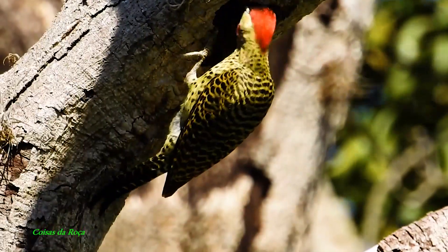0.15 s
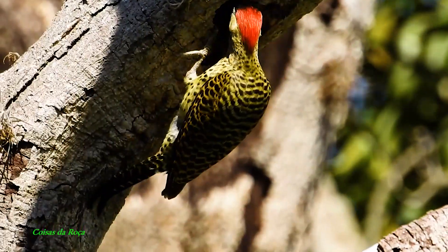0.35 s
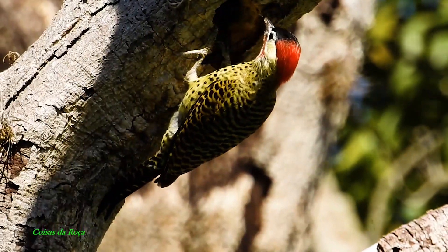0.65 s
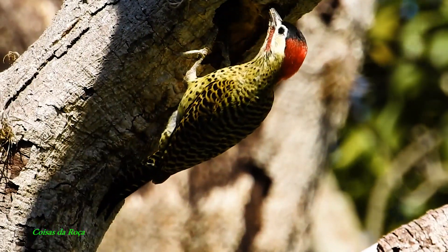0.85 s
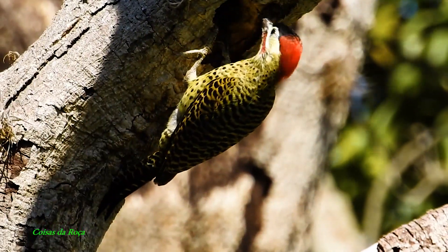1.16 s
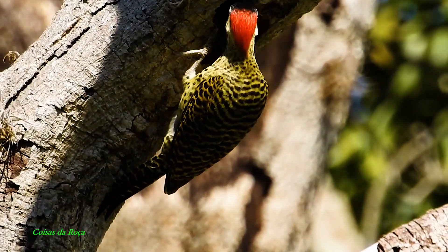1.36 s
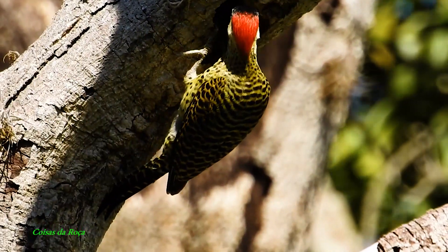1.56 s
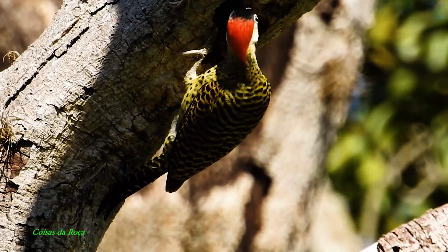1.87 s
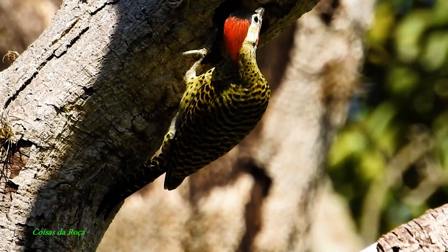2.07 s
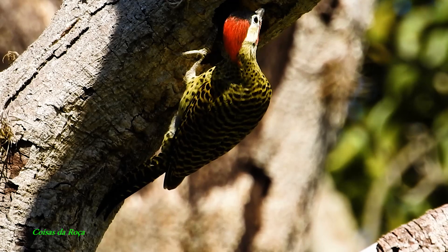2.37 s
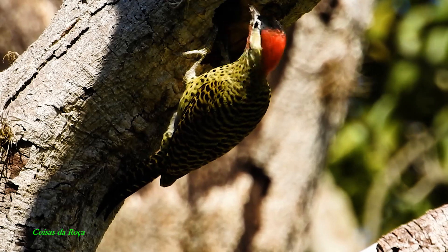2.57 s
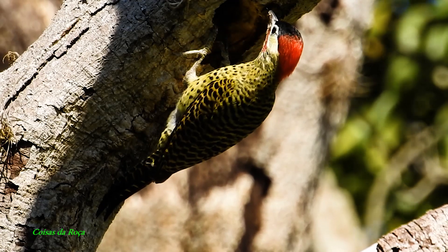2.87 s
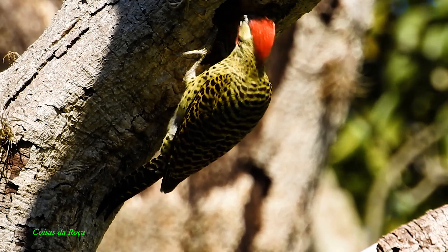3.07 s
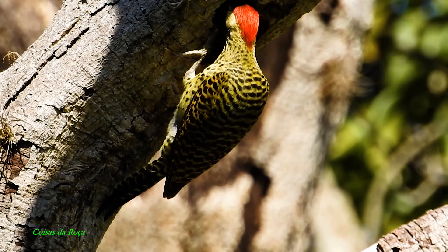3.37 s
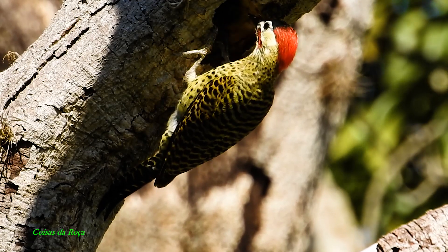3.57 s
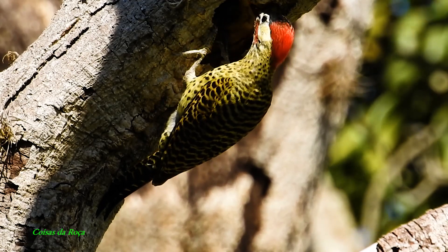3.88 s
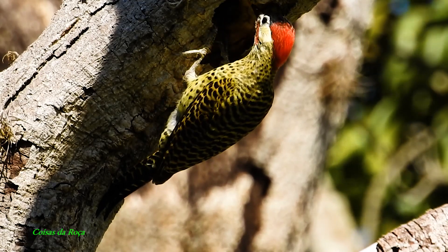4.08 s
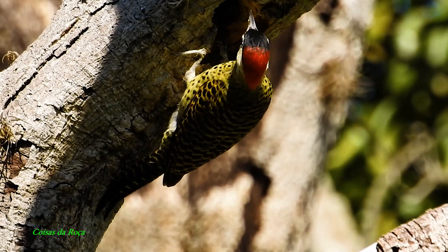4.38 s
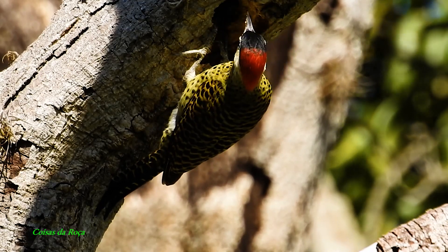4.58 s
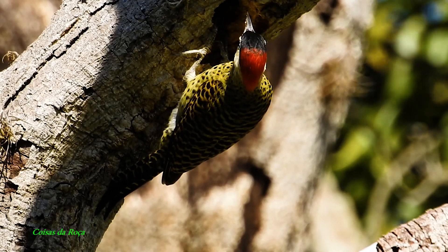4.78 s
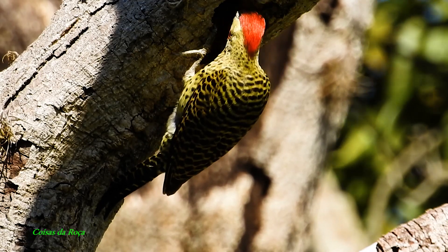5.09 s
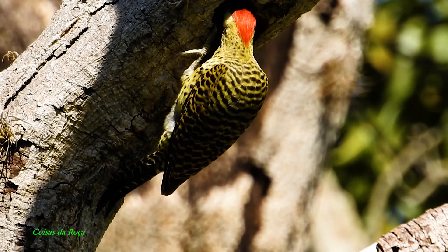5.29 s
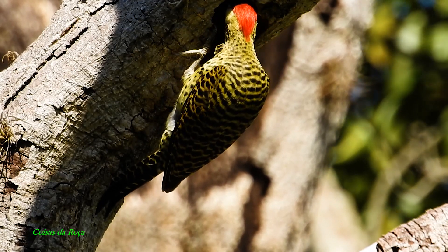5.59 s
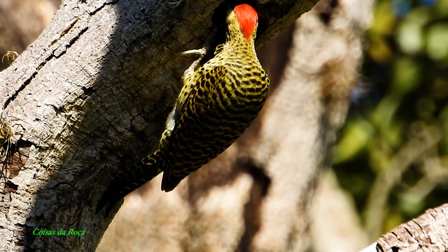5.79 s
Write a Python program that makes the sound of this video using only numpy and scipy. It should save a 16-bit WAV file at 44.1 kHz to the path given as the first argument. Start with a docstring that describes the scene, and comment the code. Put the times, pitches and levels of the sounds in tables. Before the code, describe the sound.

A woodpecker near the microphone repeats a clear, arching call seven times, each one ringing briefly through the surrounding trees. Its feet knock very faintly on the trunk. A more distant bird squeaks twice between the calls, then once more after the woodpecker stops, ending in a fluttering, sinking whine. A smooth, faint outdoor hiss continues throughout.

```python
"""Woodpecker at the nest hole

A woodpecker gives seven nasal calls, each a stack of harmonics arching in pitch; the first starts hoarse.
A second bird squeaks back three times from further off, the last time with a long falling whine.
Feet knock softly on the trunk, the trees return a short tail, and faint hiss lies under it all."""
import sys
import numpy as np
from scipy import signal
from scipy.fft import rfft, irfft, next_fast_len
from scipy.io import wavfile
from scipy.ndimage import uniform_filter1d

SR = 44100
rng = np.random.default_rng(int(sys.argv[2]) if len(sys.argv) > 2 else 0)


def waveform_to_disk(signal):
    """Save audio, clipped to [-1, 1], as 16-bit WAV at the path in sys.argv[1]."""
    frames = np.transpose(np.atleast_2d(signal))
    scaled = np.clip(frames, -1, 1) * 32767
    samples = np.round(scaled).astype(np.int16)
    wavfile.write(sys.argv[1], SR, samples)


N = 261954
TIME = np.arange(N) / SR
FFT_SIZE = 2 * next_fast_len(N // 2 + 500)
FREQS = np.fft.rfftfreq(FFT_SIZE, 1 / SR)

# how alike left and right are in sound from all sides: frequency_hz, correlation (-1 to 1)
STEREO_LIKENESS = [(300, 0.68), (700, 1), (1400, 0.95), (3100, 0.67), (6800, -0.12), (15000, -0.31)]


def woodpecker(call, sent_second_db, overtones_db, jitter=.0009, shimmer_db=.35, clear_s=0.024):
    """One arching call of nine harmonics, in two rows: heard directly, and sent into the trees."""
    # the voice breaks in the first call: time_s, roughness (0-1), half_lines_db
    hoarseness = [(.295, 1, 4), (.335, .97, 2), (.358, .88, -1), (.372, .6, -4), (.402, .93, 1),
                  (.409, .15, 1), (.44, .12, -.5), (.454, .45, -5), (.462, 0, -60)]
    # lines between the harmonics while every second cycle is weak: pitch_multiple, relative_db
    half_lines = [(1.5, 5.5), (2.5, -1), (3.5, -1.5), (4.5, 8.5), (5.5, -17), (6.5, -28)]
    part, gate = span(call[0][0], call[-1][0])
    pitch, first_db, second_db, fifth_db, sixth_db = (uniform_filter1d(c[part], 130) for c in curves(call))
    rough, half_db = (c[part] for c in curves(hoarseness))
    t = TIME[part] - TIME[part.start]
    size, crest_hz = len(pitch), pitch.max()
    # below the crest the slack voice gains third and fourth harmonics
    sag_octaves = np.log2(crest_hz / pitch)
    middle_db = [first_db + db + 35.5 * sag_octaves for db in overtones_db[:2]]
    # harmonics 6 to 9 swell as low pitch brings them toward the throat's resonance
    throat_hz, throat_db = 7000, 11
    high = np.arange(6, 10)
    slope_hz, slope_db = [throat_hz, *(high * crest_hz)], [throat_db, 0, *overtones_db[2:]]
    top_db = [np.interp(k * pitch, slope_hz, slope_db) for k in high]
    levels = [first_db, second_db, *middle_db, fifth_db] + [sixth_db + db - top_db[0] for db in top_db]
    phase = phase_of(pitch * (1 + jitter * wobble(size, 200)))
    catch = .6 * np.exp(-t / clear_s)  # each call starts with a scratch
    voice = np.zeros((2, size))
    for k, db in enumerate(levels, 1):
        # the second harmonic dips only on the direct path; the trees get it whole
        paths_db = np.array([db, first_db + sent_second_db if k == 2 else db])
        gain = undb(paths_db + shimmer_db * wobble(size, 99))
        # irregular cycles smear the high harmonics most
        smear = (rough + catch) * (.6 if k == 1 else 1)
        voice += gain * partial(k * phase + rng.uniform(0, 2 * np.pi), smear, blur_hz=220 + 45 * k)
    for multiple, db in half_lines:
        voice += undb(first_db + db + half_db) * partial(multiple * phase, rough, blur_hz=343)
    out = np.zeros((2, N))
    out[:, part] = voice * gate
    return out


def bill_beam(x, treble_db, body_db=3):
    """The open bill beams the treble: turned away, it sends more of it into the trees."""
    colour_db = along_hz([(1600, body_db), (2700, -0.36), (5000, body_db),
                          (6800, treble_db), (7700, treble_db), (9000, -1.8)])
    return irfft(rfft(x, FFT_SIZE) * undb(colour_db), FFT_SIZE)[:N]


def squeaks(jitter=0.00063, rasp_hz=5900, rasp_db=-1):
    """The far bird's three thin answers on one strong partial; where the voice cracks, it rasps above."""
    # one contour an answer: time_s, strongest_partial_hz, level_db, roughness (full at 1)
    first_answer = [(.635, 4900, -69, 0.5), (.665, 5100, -44, 0.78), (.685, 4880, -53, 0.54),
                    (.712, 5000, -38, 0.83), (.732, 4835, -47, 1.1), (.787, 4900, -42, 0.8),
                    (.82, 4800, -57, 0.5), (.87, 4690, -55, 0.5)]
    second_answer = [(3.058, 4500, -53, .6), (3.074, 4850, -45, .5), (3.079, 5350, -42, .5),
                     (3.084, 5050, -40, .5), (3.088, 5700, -46, .5), (3.1, 5650, -49, .8),
                     (3.106, 6300, -42, .3), (3.116, 6280, -43, .3), (3.121, 5000, -58, .9),
                     (3.126, 4950, -46, .9), (3.14, 4500, -55, .9), (3.147, 4500, -45, .3),
                     (3.155, 4600, -52, .9), (3.275, 4520, -55, .8)]
    third_answer = [(5.505, 4900, -50, .6), (5.511, 4830, -31.5, .15), (5.516, 4830, -30.5, .15),
                    (5.52, 4850, -41, .4), (5.525, 4840, -33, .3), (5.53, 4950, -35, .5),
                    (5.537, 5900, -40, .7), (5.545, 5300, -47, .9), (5.549, 4800, -32, .4),
                    (5.552, 6280, -37, .25), (5.562, 6280, -36, .2), (5.569, 5200, -46, .9),
                    (5.574, 4750, -35, .3), (5.585, 4750, -50, .8)]
    # the squeak's timbre: multiple_of_strongest, gain_db
    partials = [(.5, -16), (1, 6.5), (1.5, -14.5)]
    out = np.zeros(N)
    for answer in (first_answer, second_answer, third_answer):
        part, gate = span(answer[0][0], answer[-1][0])
        hz, level_db, rough = (c[part] for c in curves(answer))
        phase = phase_of(hz * (1 + jitter * wobble(len(hz), 120)))
        tone = sum(undb(db) * partial(multiple * phase, rough, blur_hz=305) for multiple, db in partials)
        rasp = undb(rasp_db) * rough * partial(2 * np.pi * rasp_hz * TIME[part], 0.95, blur_hz=816)
        out[part] += (tone + rasp) * gate * undb(level_db)
    return out


def whine(first_hz=1563, fall_hz=217.5, fundamental_db=-65, flutter_db=1.6, jitter=0.0011):
    """The far bird's last squeak trails into a fluttering note that sinks ever faster."""
    # the two harmonics that carry the note: time_s, second_db, third_db
    harmonics = [(5.575, -45, -39), (5.635, -55, -36.5), (5.66, -47, -33.5), (5.75, -48.5, -39.5),
                 (5.772, -45, -56), (5.785, -61, -59), (5.81, -49, -37.5), (5.845, -65, -49),
                 (5.88, -71, -48), (5.893, -67, -41), (5.905, -68, -55)]
    part, gate = span(5.575, 5.92)
    t = TIME[part] - TIME[part.start]
    pitch = first_hz - fall_hz * (t / t[-1]) ** 2.4
    # starts rough, clears, and breaks up at the end
    rough = 0.1 + 1.4 * np.exp(-t / 0.02) + .7 * np.exp((t - t[-1]) / .06)
    second_db, third_db = (c[part] for c in curves(harmonics))
    phase = phase_of(pitch * (1 + jitter * wobble(len(t), 120)))
    out = np.zeros(N)
    for k, db in enumerate([fundamental_db, second_db, third_db], 1):
        gain = undb(db + flutter_db * wobble(len(t), 45))
        out[part] += gate * gain * partial(k * phase, rough, blur_hz=200)
    return out


def scratches():
    """Around its last answer the far bird's voice catches in brief, rough glides."""
    # scratchy notes: start_s, length_s, first_hz, last_hz, level_db, roughness (full at 1)
    glides = [(5.452, 0.066, 3140, 3650, -44.5, 1.1), (5.487, 0.022, 4960, 5900, -38, 0.9),
              (5.539, 0.023, 3210, 3140, -43.5, 0.5), (5.561, 0.02, 1534, 1530, -48.5, 0.26),
              (5.671, 0.02, 2660, 2520, -44, 0.8), (5.684, 0.013, 1760, 2040, -45, 0.8)]
    out = np.zeros(N)
    for start_s, length_s, first_hz, last_hz, db, rough in glides:
        part, gate = span(start_s, start_s + length_s, attack_s=length_s / 2, release_s=0.0041)
        phase = phase_of(np.linspace(first_hz, last_hz, len(gate)))
        out[part] += undb(db) * gate * partial(phase, rough, blur_hz=280)
    return out


def foot_knocks(contact_s=0.014, trim_db=-3):
    """Each shift of the woodpecker's feet is a short scuff that rings the trunk."""
    # soft knocks of the feet: start_s, level_db
    knocks = [(.825, -75), (1.498, -76), (1.585, -82), (1.925, -82), (1.998, -83), (2.324, -81),
              (2.669, -82)]
    # the trunk's resonances: pitch_hz, relative_db, t60_s
    trunk_modes = [(225, -14, .1), (260, -13, .09), (334, -4, 0.059)]
    t = TIME[:SR // 4]
    ring = sum(undb(db - 60 * t / t60) * np.sin(2 * np.pi * hz * t) for hz, db, t60 in trunk_modes)
    out = np.zeros(N)
    for start_s, db in knocks:
        scuff = rng.standard_normal(len(t)) * t * np.exp(-t / contact_s)
        knock = signal.fftconvolve(scuff, ring)
        first = int(start_s * SR)
        out[first:first + len(knock)] += undb(db + trim_db) * knock / np.abs(knock).max()
    return out


def bark_echoes(x):
    """Trunk and limbs within a few metres throw the call back at once, doubling its final drop."""
    echoes = [(6.37, -37.5, 2), (10.87, -18.5, -2), (20.49, -23.5, 1)]  # delay_ms, level_db, pan_db
    return sum(np.roll(x, int(ms * SR / 1000)) * undb(db) * pan(pan_db) for ms, db, pan_db in echoes)


def tree_scatter(x, short_t60_s=0.5, long_t60_s=0.64, long_db=5, build_s=0.0062):
    """Trunks and foliage scatter the calls into a short tail; leaves return treble best."""
    t = TIME[:SR]
    decay = undb(long_db - 60 * t / long_t60_s) + undb(-60 * t / short_t60_s)
    envelope = decay * np.clip(t / build_s, 0, 1)
    tail = rng.standard_normal((2, SR)) * envelope / np.sqrt(np.sum(envelope ** 2))
    colour_db = along_hz([(1400, -10), (3000, -1.0), (4500, -5.0), (7500, 0.5), (9000, -21.5)])
    response = diffuse(rfft(tail, FFT_SIZE) * undb(colour_db))[:, :SR]
    return signal.fftconvolve(x[None], response, axes=1)[:, :N]


def hiss(level_db=-46.5, waver_db=0.4, split_hz=2000, low_waver_db=.9):
    """A smooth bed of outdoor hiss whose low band swells a little, then eases off."""
    # the colour of the hiss: frequency_hz, relative_db
    spectrum = [(100, -62), (200, -49.5), (320, -41), (470, -28.5), (740, -20), (900, -13), (1340, -6),
                (2130, -3), (2870, -3.5), (3320, -1), (4100, -3.5), (6200, 1.5), (7200, -1.5),
                (8600, -15.5), (10000, -22), (15500, -34)]
    # the low band's slow swell: time_s, gain_db
    low_swell = [(0, 0), (1.6, 3), (3.3, 2), (4, -1.5), (5.9, -1)]
    likeness = np.clip(along_hz(STEREO_LIKENESS), -.5, 1)
    white = rfft(rng.standard_normal((2, FFT_SIZE)))
    air = diffuse(white * undb(along_hz(spectrum)) / np.sqrt(1 + likeness))
    air /= air.mean(axis=0).std()
    air *= undb(level_db + waver_db * wobble(N, 14.0)) * pan(-1)
    low = irfft(rfft(air, FFT_SIZE) / (1 + (FREQS / split_hz) ** 8), FFT_SIZE)[:, :N]
    low_db = curves(low_swell)[0] + low_waver_db * wobble(N, 11)
    return low * undb(low_db) + (air - low)


def undb(db):
    """Decibels to gain."""
    return 10 ** (np.asarray(db) / 20)


def curves(rows):
    """Breakpoints to envelopes: each column after the time, joined by straight lines."""
    times, *columns = np.transpose(rows)
    return [np.interp(TIME, times, c) for c in columns]


def along_hz(points):
    """A curve of (frequency_hz, value) points, joined on a log frequency scale."""
    hz, value = np.transpose(points)
    return np.interp(np.log(FREQS + 1), np.log(hz), value)


def span(start_s, end_s, attack_s=0.0016, release_s=0.002):
    """The samples that a note covers, and a gate with rounded edges."""
    part = slice(int(start_s * SR), min(N, int(end_s * SR)))
    t = TIME[part] - TIME[part.start]
    opening = np.clip(np.minimum(t / attack_s, t[::-1] / release_s), 0, 1)
    return part, np.sin(np.pi / 2 * opening) ** 2


def wobble(size, hz):
    """Random motion of spread 1, low-passed at hz."""
    x = signal.sosfilt(signal.butter(4, hz, fs=SR, output="sos"), rng.standard_normal(size))
    return x / x.std()


def phase_of(hz):
    """The running phase of a gliding pitch."""
    return 2 * np.pi * np.cumsum(hz) / SR


def partial(phase, rough, blur_hz):
    """One line of a voice; roughness trades its clean tone for a band of irregular vibration."""
    rough = np.clip(rough, 0, 1)
    blur = wobble(len(phase), blur_hz) * np.sin(phase) + wobble(len(phase), blur_hz) * np.cos(phase)
    return np.sqrt(1 - rough ** 2) * np.sin(phase) + rough * blur / np.sqrt(2)


def pan(pan_db):
    """Stereo gains, with the left pan_db above the right."""
    return undb([[pan_db / 2], [-pan_db / 2]])


def place(x, pan_db, lag_ms):
    """The sound reaches the two microphone ports with different strength and delay."""
    delay = np.exp(-2j * np.pi * FREQS * lag_ms / 1000)
    late = irfft(rfft(x, FFT_SIZE) * delay, FFT_SIZE)[:N]
    return np.array([x, late]) * pan(pan_db)


def diffuse(spectra):
    """Two unrelated spectra as sound from all sides: narrow in the lows, wide in the treble."""
    likeness = np.clip(along_hz(STEREO_LIKENESS), -.99, .99)
    mid = spectra[0] * np.sqrt((1 + likeness) / 2)
    side = spectra[1] * np.sqrt((1 - likeness) / 2)
    return irfft(np.array([mid + side, mid - side]), FFT_SIZE)[:, :N]


def scene(call_send_db=-10, whine_send_db=-13):
    """The near woodpecker, the far bird, their scatter among the trees, and the hiss."""
    # seven calls, each scooping up to a crest and dropping off, with the levels of four harmonics:
    # time_s, pitch_hz, first_db, second_db, fifth_db, sixth_db
    calls = [
        [(0.295, 882, -69, -60.0, -58.0, -70), (0.299, 941, -66, -44.5, -74, -67),
         (0.33, 1229, -49.5, -36, -35, -43.5), (0.352, 1447, -44.5, -39, -39, -74),
         (0.367, 1445, -39.5, -36, -36, -55), (0.407, 1467, -40.5, -38.5, -33, -65),
         (0.417, 1470, -39.5, -64, -31, -74.0), (0.462, 1525, -33.5, -34, -31.5, -67.0),
         (0.483, 1505, -31, -36, -29, -52), (0.494, 1488, -35, -48, -31, -62),
         (0.502, 1390, -43, -29, -24.5, -62), (0.507, 1180, -48.5, -45, -36, -41),
         (0.513, 990, -61, -57, -68, -45)],
        [(0.872, 862, -72.0, -56.0, -65, -52.0), (0.877, 926, -69.5, -39, -61.0, -56),
         (0.884, 1098, -48.5, -39, -61.0, -39), (0.894, 1265, -52.5, -46.5, -38.5, -46),
         (0.917, 1393, -40.5, -34.0, -26, -40), (0.929, 1417, -36, -36, -33.5, -38),
         (0.942, 1462, -31.5, -60, -22, -38), (0.953, 1481, -32.5, -40.0, -20, -40.5),
         (0.978, 1487, -30.0, -33.5, -17, -37), (1.01, 1472, -28.0, -52, -13.5, -40),
         (1.032, 1458, -34, -48.0, -13, -39), (1.051, 1420, -31.5, -38, -24.0, -37.5),
         (1.06, 1398, -39.5, -29.5, -16.5, -45), (1.067, 1182, -57, -44, -34, -25.5),
         (1.072, 1015, -47, -30, -63, -48), (1.076, 923, -68.5, -48, -59.0, -58)],
        [(1.448, 898, -75, -64.5, -71.5, -58.5), (1.452, 936, -69, -44.5, -57.0, -55.0),
         (1.463, 1120, -62.0, -37.5, -40, -45), (1.469, 1262, -47, -48, -32, -54),
         (1.475, 1267, -55, -37, -44, -55.0), (1.487, 1335, -50, -46, -31, -51),
         (1.511, 1393, -39.5, -36.5, -36.5, -51.0), (1.525, 1458, -36.5, -44, -28.5, -50),
         (1.572, 1470, -35, -31.5, -25.5, -47.5), (1.628, 1478, -35.5, -37.5, -28.5, -49.0),
         (1.643, 1446, -35, -43, -23.0, -48), (1.653, 1333, -50, -40.5, -24, -47),
         (1.662, 946, -72, -45, -73, -44)],
        [(2.022, 890, -75.0, -58, -59.0, -59), (2.03, 967, -55.5, -37.5, -64.0, -49),
         (2.042, 1167, -50, -45, -42, -48), (2.055, 1342, -48, -37, -31, -51),
         (2.073, 1396, -36.5, -35, -39, -49), (2.085, 1445, -33.5, -43.5, -33.5, -59),
         (2.106, 1463, -35, -33, -51, -43.5), (2.144, 1506, -33, -25.0, -36.5, -46),
         (2.168, 1500, -30.5, -23.5, -37.5, -46), (2.178, 1504, -30, -25.5, -47.0, -46.5),
         (2.186, 1470, -31, -30, -32.5, -40), (2.194, 1393, -40, -42, -33.5, -50),
         (2.205, 1043, -66, -32.5, -59, -38), (2.209, 946, -75.5, -48.0, -69.0, -50.0)],
        [(2.698, 863, -66, -64, -67.0, -53.5), (2.709, 1025, -61, -38, -59, -49),
         (2.718, 1184, -51, -49.0, -68, -51), (2.732, 1317, -58, -39, -32, -45),
         (2.743, 1363, -41, -39.5, -50, -43), (2.761, 1407, -39, -37, -34.5, -43),
         (2.778, 1436, -34, -65, -25.5, -39.5), (2.818, 1460, -33.5, -33.5, -23.5, -38.0),
         (2.848, 1472, -30.0, -36, -15.5, -35), (2.871, 1433, -33.5, -39.0, -18.0, -34.5),
         (2.876, 1433, -30, -50.5, -14.5, -39), (2.88, 1350, -46, -31, -16.5, -37),
         (2.887, 1223, -47, -50, -32, -24), (2.894, 1020, -61, -35, -72, -43),
         (2.899, 960, -74, -43, -66.0, -58)],
        [(3.325, 871, -68, -70.0, -61, -55), (3.348, 1141, -48, -40.5, -67.0, -50),
         (3.363, 1258, -53, -55.5, -40, -62), (3.376, 1330, -47, -37, -42.5, -55),
         (3.421, 1409, -37, -34.5, -36, -53), (3.44, 1424, -34.5, -38, -40, -80.5),
         (3.456, 1434, -35.5, -43, -38.5, -68), (3.491, 1456, -34.5, -63, -37, -72),
         (3.5, 1380, -40, -36.5, -35, -58), (3.512, 1126, -61, -50.5, -65.5, -46),
         (3.516, 1031, -72.5, -56.0, -64.0, -62.0)],
        [(3.935, 908, -70, -63.5, -67, -60.5), (3.942, 1009, -61, -38, -66, -49.0),
         (3.95, 1114, -57, -39.5, -54, -53), (3.959, 1275, -57, -40, -45, -62),
         (3.984, 1420, -37.0, -34.5, -49, -61), (4.002, 1441, -35, -51.0, -43, -59),
         (4.022, 1480, -32, -31.5, -34.0, -51.5), (4.047, 1502, -31, -25.5, -31, -58),
         (4.094, 1494, -28.5, -24.5, -32.5, -56), (4.109, 1488, -28.5, -32.5, -27.5, -48),
         (4.119, 1448, -32, -31, -29, -59), (4.126, 1320, -43.0, -36.5, -26.5, -50),
         (4.138, 904, -76, -34.5, -65, -40)],
    ]
    # the head turns between calls, one row a call: pan_db, sent_second_db (over the fundamental),
    # sent_treble_db, third_db, fourth_db (over the fundamental, at the crest),
    # seventh_db, eighth_db, ninth_db (over the sixth, at the crest)
    head_turns = [(-0.099, 3, -.5, -18, -5, -20, -38, -27), (0.042, 0, -4, -18.5, -7.5, -11.5, -29, -42),
                  (-0.61, 1, -2, -7.5, -0.5, -7, -46, -29),
                  (-0.0066, 3.5, 10.5, -13, -13.5, -2.5, -26, -16),
                  (-.3, 1, -3.5, -16.5, -7, -8.5, -31, -37), (-.3, 3, 5.5, -16, -12.5, -12, -35, -28),
                  (-1, 0, 9.5, -7, -4.5, -5, -22, -19)]
    near, outward = 0, 0
    for call, (pan_db, sent_second_db, sent_treble_db, *overtones_db) in zip(calls, head_turns):
        voice, sent = woodpecker(call, sent_second_db, overtones_db)
        near += place(voice, pan_db, lag_ms=0.0067) + bark_echoes(bill_beam(voice, sent_treble_db))
        outward += bill_beam(sent, sent_treble_db)
    answers = squeaks()
    rough_whine = whine() + scratches()
    far = place(answers + rough_whine, pan_db=-0.5, lag_ms=0.045)
    tail = tree_scatter(undb(call_send_db) * outward + answers + undb(whine_send_db) * rough_whine)
    return near + far + tail + hiss() + foot_knocks()


def record(dry):
    """The recorder cuts the deep bass and the very top."""
    low_cut = signal.butter(2, 150, "high", fs=SR, output="sos")
    top_cut = signal.ellip(10, .2, 80, 15650, fs=SR, output="sos")
    return signal.sosfilt(top_cut, signal.sosfilt(low_cut, dry))


dry = scene()
out = record(dry)
waveform_to_disk(out)
```